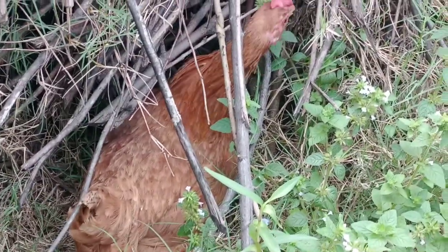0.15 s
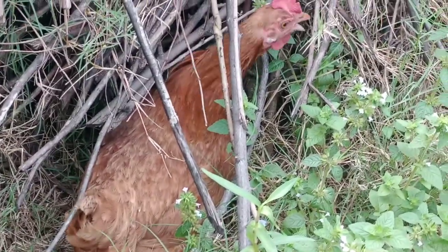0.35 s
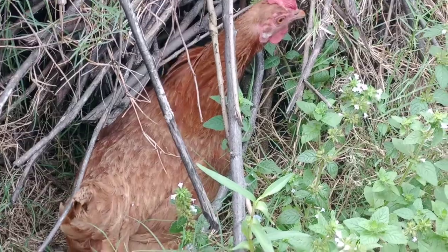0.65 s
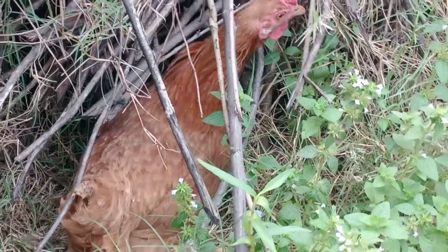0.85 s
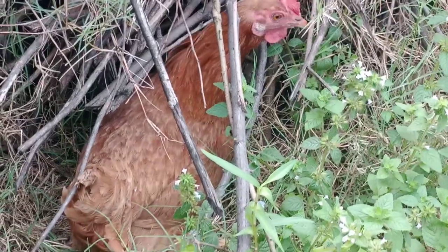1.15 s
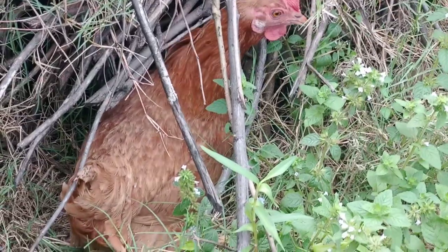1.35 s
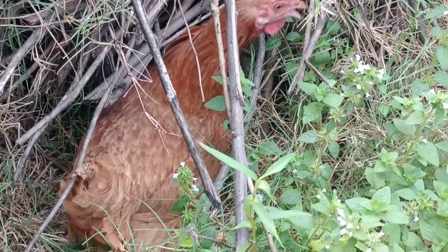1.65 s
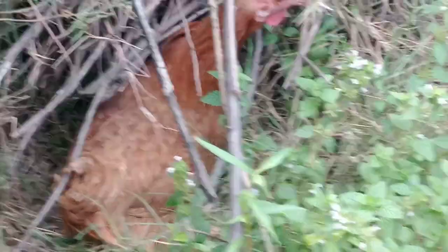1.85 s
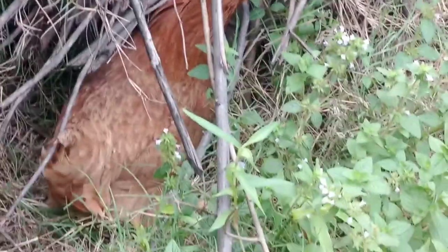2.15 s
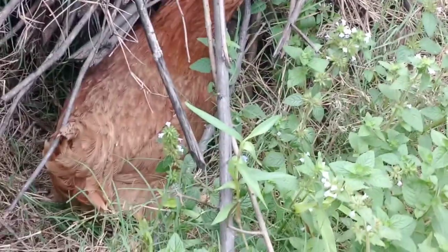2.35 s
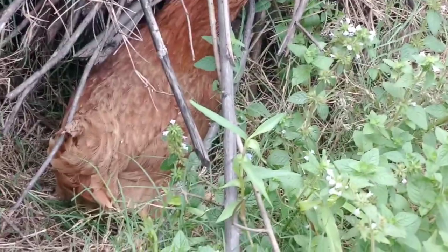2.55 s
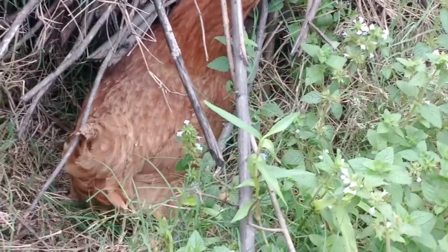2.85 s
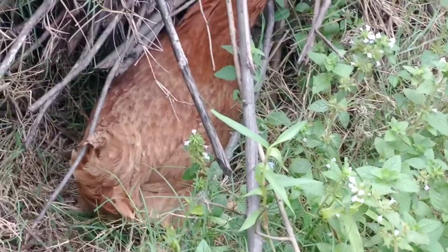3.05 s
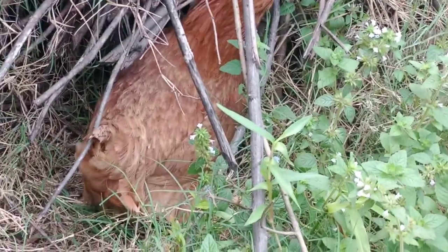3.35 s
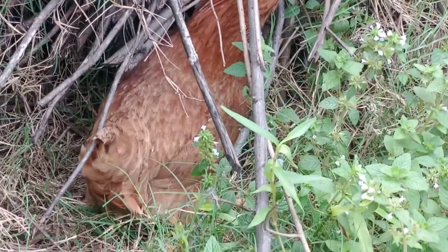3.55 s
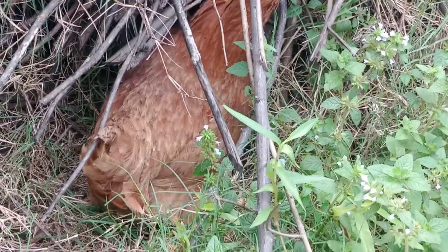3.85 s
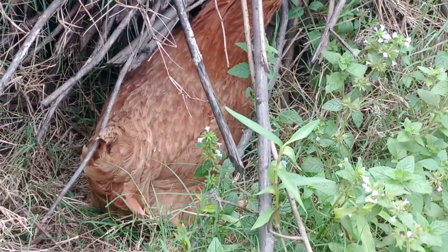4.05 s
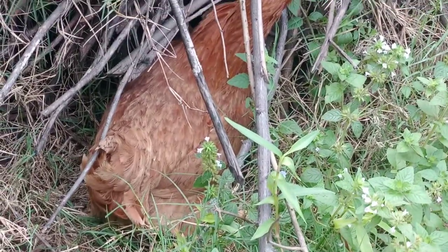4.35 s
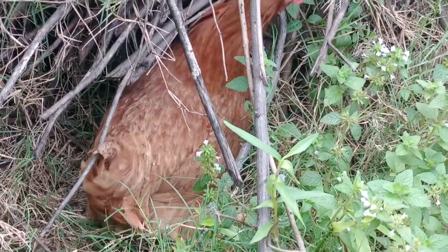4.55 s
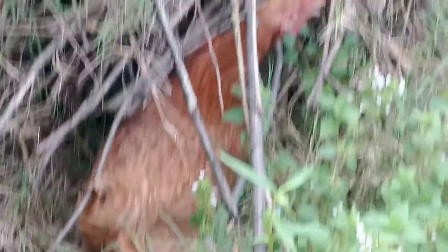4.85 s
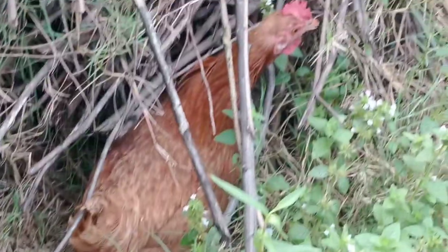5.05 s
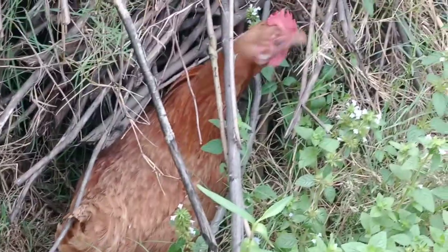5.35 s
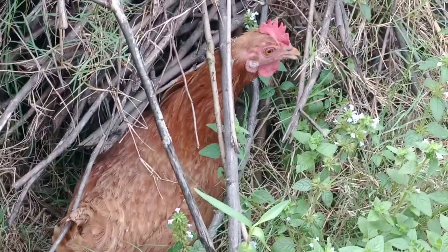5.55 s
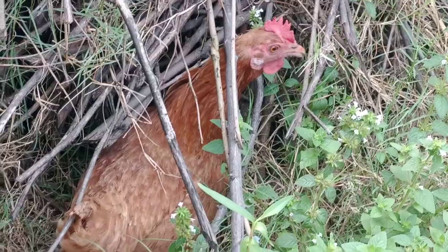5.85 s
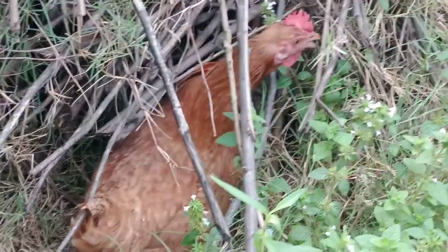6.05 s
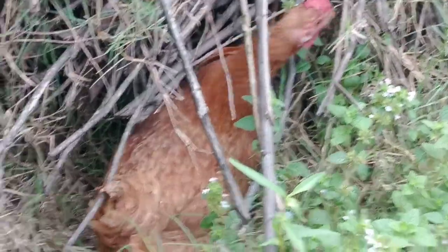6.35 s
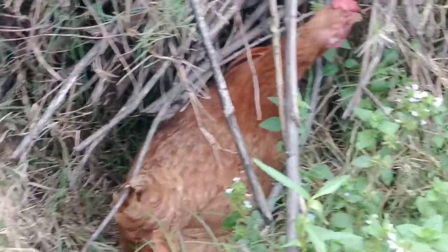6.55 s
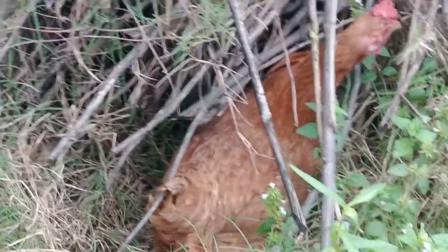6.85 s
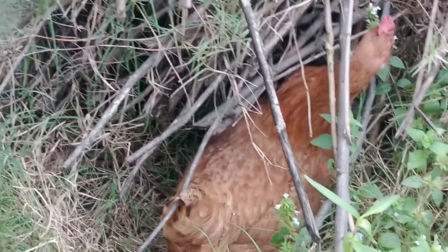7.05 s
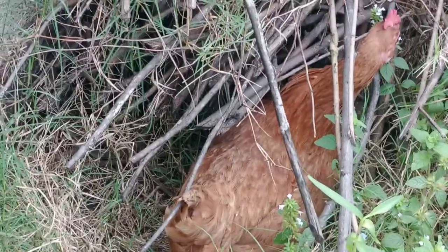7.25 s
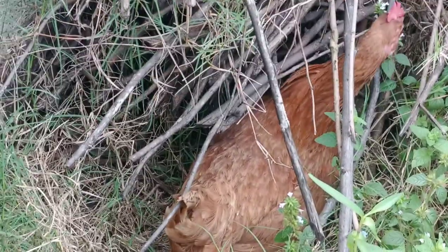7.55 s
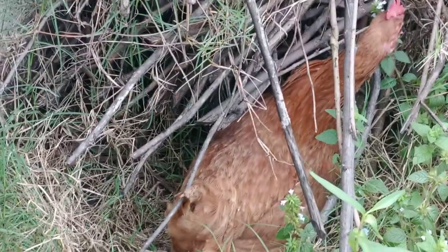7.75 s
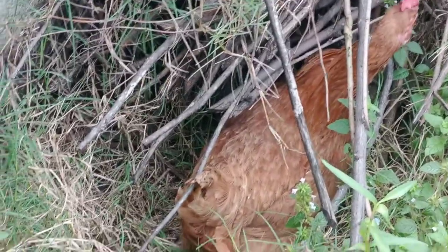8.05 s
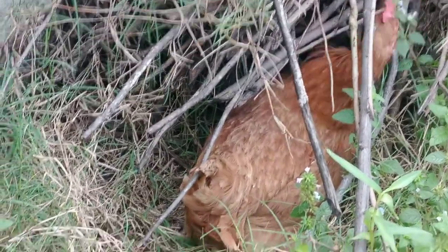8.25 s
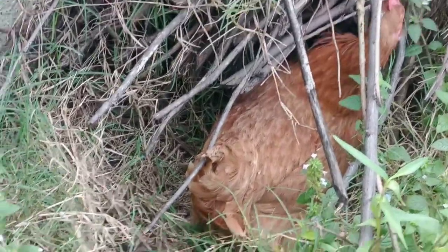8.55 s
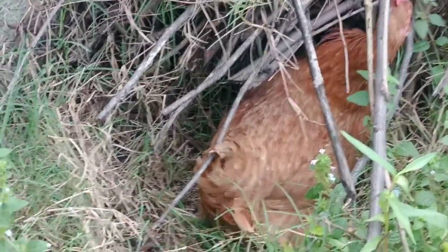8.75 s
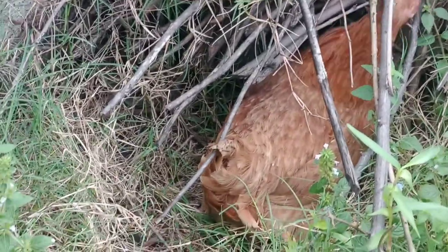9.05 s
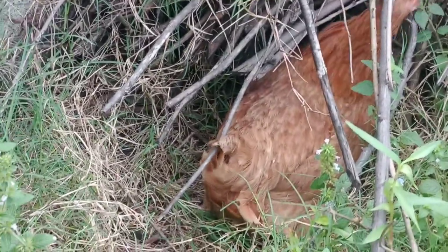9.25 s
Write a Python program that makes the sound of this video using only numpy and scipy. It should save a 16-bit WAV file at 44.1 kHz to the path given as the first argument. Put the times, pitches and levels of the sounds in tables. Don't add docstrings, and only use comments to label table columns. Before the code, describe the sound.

Rapid hen cackling outdoors: short muffled clucks, raspy open squawks every half second or so, a late drawn-out cry, faint distant birds behind.

```python
import sys
import numpy as np
from scipy import signal
from scipy.io import wavfile
from scipy.ndimage import uniform_filter1d

SR = 44100
rng = np.random.default_rng(int(sys.argv[2]) if len(sys.argv) > 2 else 0)


def unload_audio(sound):
    columns = np.transpose(np.atleast_2d(sound))
    steps = np.round(np.clip(columns, -1, 1) * 32767)
    wavfile.write(sys.argv[1], SR, steps.astype(np.int16))


def ratio_of_db(decibels):
    return 10 ** (np.asarray(decibels, float) / 20)


N = 414981


def rms_one(x):
    return x / np.sqrt(np.mean(x ** 2) + 1e-20)


def band(x, low_hz, high_hz):
    return signal.sosfilt(signal.butter(3, [low_hz, high_hz], "band", fs=SR, output="sos"), x)


def band_noise(size, low_hz, high_hz):
    return rms_one(band(rng.standard_normal(size), low_hz, high_hz))


def wobble(size, rate_hz):
    sos = signal.butter(2, rate_hz, fs=SR, output="sos")
    return rms_one(signal.sosfilt(sos, rng.standard_normal(size + 2000))[2000:])


def swell(size, edge):
    return signal.windows.tukey(size, np.clip(edge, 0, 1))


def add(track, start, sound):
    a, b = max(start, 0), min(start + len(sound), N)
    track[a:b] += sound[a - start:b - start]


def insects():
    # low_hz, high_hz, level_db, throbs_per_s, throb_depth (0-1)
    choruses = [
        (3800, 4050, -75.5, 47, 0.7),
        (6400, 8100, -83.5, 36, .1),
        (7230, 7400, -76.5, 39.5, 1),
        (5000, 5450, -88, 37, 0.4),
    ]
    t, out = np.arange(N) / SR, np.zeros(N)
    for low_hz, high_hz, level_db, throbs, depth in choruses:
        throb = 1 + min(depth, 1 / 4) * np.sin(2 * np.pi * throbs * t + 1.5 * wobble(N, 6.6))
        drift = ratio_of_db(level_db + 2.2 * wobble(N, 2.5))
        out += drift * throb * band_noise(N, low_hz, high_hz)
    return out


def faint_air():
    air = ratio_of_db(-83 + 4.2 * wobble(N, 5)) * band_noise(N, 1300, 1900)
    hiss = ratio_of_db(-83) * band_noise(N, 60, 6000)
    rumble = ratio_of_db(-78.5) * wobble(N, 40)
    return air + hiss + rumble


def far_fowl():
    # start_s, end_s, start_hz, end_hz, level_db
    far_notes = [(0.739, 0.765, 450, 453, -84), (0.776, 0.793, 446, 429.3, -62),
                 (0.791, 0.865, 430, 400, -69), (2.507, 2.624, 428, 394, -67.5),
                 (3.37, 3.423, 443, 417, -66), (3.6, 3.627, 582, 560, -73), (3.645, 3.687, 587, 562, -63),
                 (4.192, 4.25, 442, 438, -70.5), (4.29, 4.44, 393, 389, -72), (4.301, 4.45, 585, 575, -66),
                 (7.809, 7.87, 445, 430, -71), (7.82, 7.87, 600, 585, -65.5), (4.458, 4.559, 586, 540, -71),
                 (5.314, 5.435, 454, 410, -68), (6.661, 6.71, 435, 435, -67),
                 (6.765, 6.909, 400, 391, -69.5), (8.069, 8.185, 579, 553, -71),
                 (8.259, 8.367, 537, 533, -76.5)]
    partials_db = [-26.5, 5.5, -0.5, -24.5]
    dull_above_hz, dull_db = 1500, -12
    out = np.zeros(N)
    for start_s, end_s, from_hz, to_hz, level_db in far_notes:
        size = round((end_s - start_s) * SR)
        pitch_hz = np.linspace(from_hz, to_hz, size) * (1 + 0.0087 * wobble(size, 60))
        phase = 2 * np.pi * np.cumsum(pitch_hz) / SR
        tone = np.zeros(size)
        for k, partial_db in enumerate(partials_db, 1):
            lost_db = dull_db * (k * from_hz > dull_above_hz)
            tone += ratio_of_db(partial_db + lost_db + 2.3 * wobble(size, 30)) * np.sin(k * phase)
        add(out, round(start_s * SR), ratio_of_db(level_db) * swell(size, 0.56) * tone)
    return out


def far_rasps():
    # start_s, end_s, low_hz, high_hz, level_db
    rasp_calls = [
        (0.806, 1.087, 1490, 1940, -57.5),
        (4.331, 4.484, 1550, 2060, -68.5),
        (5.247, 5.466, 1663, 1920, -60.5),
        (6.669, 6.802, 632, 2240, -62.5),
        (6.901, 7.089, 1623, 2117, -86.5),
        (7.802, 7.922, 3400, 5000, -59),
        (8.412, 8.551, 1204, 2420, -67.5),
        (8.474, 8.686, 3560, 4800, -63.5),
    ]
    out = np.zeros(N)
    for start_s, end_s, low_hz, high_hz, level_db in rasp_calls:
        size = round((end_s - start_s) * SR)
        rasp = band_noise(size, low_hz, high_hz)
        add(out, round(start_s * SR), ratio_of_db(level_db) * swell(size, 0.57) * rasp)
    return out


def yard(x):
    early_t60_s, late_t60_s = 0.11, 0.32
    t = np.arange(SR // 2) / SR
    early = rng.standard_normal(len(t)) * ratio_of_db(-60 * t / early_t60_s) * (t > .003)
    late = band(rng.standard_normal(len(t)), 1350, 3300) * ratio_of_db(-60 * t / late_t60_s) * (t > .012)
    tail = ratio_of_db(-9.5) * early / np.linalg.norm(early) + ratio_of_db(-27.5) * late / np.linalg.norm(late)
    return signal.fftconvolve(x, tail)[:N]


def resonance(x, hz, width_hz):
    r = np.exp(-np.pi * width_hz / SR)
    zeros = np.array([1, 0, -1]) * (1 - r * r) / 2
    poles = [1, -2 * r * np.cos(2 * np.pi * hz / SR), r * r]
    return signal.lfilter(zeros, poles, x)


def evened(x):
    power = uniform_filter1d(uniform_filter1d(x ** 2, size=400), size=400)
    return x / np.sqrt(power + 1e-12)


def played(row, course):
    start_s, length_s, level_db, pair_hz, odd_db = row
    return [(start_s + share * length_s, level_db + rise_db, pair_hz * rate, offset_db + part * odd_db, breath_db)
            for share, rise_db, rate, offset_db, part, breath_db in course]


def call(rows, throat, scoop, jitter, shimmer_db, upper_db, bright, open_s):
    s, level_db, pair_hz, odd_db, breath_db = np.transpose(rows)
    t = np.arange(s[0] - .03, s[-1] + .04, 1 / SR)
    breath = ratio_of_db(np.minimum(np.interp(t, s, breath_db), -5))
    slack = scoop * (np.exp(-np.abs(t - s[0]) / .012) + 0.46 * np.exp(-np.abs(t - s[-1]) / 0.0092))
    beat = 1 - slack + jitter * breath * wobble(len(t), 150)
    rate_hz = uniform_filter1d(np.interp(t, s, pair_hz), size=500) * beat
    phase = 2 * np.pi * np.cumsum(rate_hz) / SR
    odd = ratio_of_db(np.interp(t, s, odd_db))
    lines = np.zeros(len(t))
    for k in range(1, int(15500 / pair_hz.max())):
        lines += (odd if k % 2 else 1) * np.cos(k * phase + k * k)
    puffs = rng.standard_normal(len(t)) * (1 + .5 * np.cos(2 * phase)) * np.maximum(odd, 1)
    low = lines + 4.0 * breath * puffs
    middle = lines + 3.5 * np.sqrt(breath) * puffs
    top = lines + 3.5 * breath ** 0.13 * puffs
    sources = [lines] + [low] * 3 + [middle] * 4 + [top] * 2
    edges_s = np.r_[s[0] - .004, s, s[-1] + .016]
    effort = np.interp(t, edges_s, np.r_[0, ratio_of_db(level_db), 0])
    effort_db = 20 * np.log10(effort + 1e-7)
    smooth_effort_db = uniform_filter1d(np.maximum(effort_db, -45) + 18.5, size=900)
    sharp = ratio_of_db(upper_db + bright * smooth_effort_db)
    sharp = sharp * np.clip((t - s[0]) / open_s, .1, 1)
    rings = []
    for k, (hz, width_hz, ring_db) in enumerate(throat):
        ring = resonance(resonance(sources[k], hz, width_hz), hz, width_hz)
        rings.append((-1) ** k * ratio_of_db(ring_db) * ring)
    voice = evened(evened(sum(rings[:4])) + sharp * evened(sum(rings[4:])))
    shimmer = shimmer_db * np.sqrt(breath) * wobble(len(t), 51)
    return round(t[0] * SR), voice * ratio_of_db(effort_db + shimmer)


def clucks():
    # centre_hz, width_hz, level_db
    beak_shut = [(263, 110, -25.5), (702, 350, -26.5), (1045.3, 206, 1.5), (1324, 240, -17),
                 (1620, 440, -22), (2420, 140, -31.5), (3590, 420, -28), (4268, 480, -32),
                 (7060, 1000, -47), (12500, 5700, -60)]
    beak_ajar = [(472, 300, -25), (715, 200, -27), (1030, 300, 4.5), (1570, 300, -7), (1848, 370, -19.5),
                 (2460, 420, -33.5), (3350, 300, -16), (4130, 700, -34), (6590, 2800, -46),
                 (12040, 4200, -61)]
    # start_s, length_s, level_db, pair_rate_hz, odd_against_even_lines_db
    uneven_clucks = [(0.863, 0.0533, -22, 328, 9.5), (1.109, .046, -23.5, 316, 6.5),
                     (2.04, 0.052, -16, 380.7, 2.5), (2.347, .059, -19.5, 364.3, 2),
                     (2.855, 0.052, -19.5, 358, 0), (3.22, 0.054, -20.5, 349.6, 1),
                     (4.575, 0.057, -21, 337.5, 2.5), (4.929, 0.06, -17.5, 376.6, 5),
                     (5.432, 0.0527, -22, 324.9, 1.5), (5.667, 0.045, -22.5, 321.8, 2.5),
                     (5.965, 0.055, -23, 313.6, 1.5), (7.88, 0.047, -19.5, 355.2, 5.5)]
    even_clucks = [(0.005, 0.049, -22, 267, -2), (0.379, 0.059, -19, 331.6, -24),
                   (4.049, 0.06, -19, 339.2, -19.5), (6.34, 0.055, -18, 312, -25),
                   (8.356, 0.044, -24.5, 237, -11)]
    ringing_clucks = [(1.423, 0.042, -18.5, 261.4, -12), (1.671, 0.054, -19.5, 261.4, -14.5),
                      (2.624, 0.048, -14, 294.5, -18.5), (3.47, 0.049, -15.5, 293.7, -11),
                      (3.704, .05, -15.5, 293.2, -12.5), (7.099, .051, -19, 263.7, -16.5),
                      (7.488, 0.052, -14.5, 308.3, -19)]
    ajar_clucks = [
        (8.933, 0.048, -22, 258, -26),
        (9.33, 0.053, -19.5, 321.7, -15.5),
        (9.403, .06, -20, 326, -7),
    ]
    # length_share, level_db, rate_share, odd_offset_db, odd_db_share, breath_against_lines_db
    uneven_course = [
        (0, -13.5, .82, 2.44, 0.039, -6),
        (0.251, -2, .96, 0, 0.34, -7.5),
        (0.499, 0, 1.0, 0.082, 1, -10),
        (.8, -1.5, .96, 0, 0.93, -9),
        (1, -12, 0.94, 2.28, 0.1, -6),
    ]
    even_course = [
        (0, -10, .8, 0, 0.7, -7),
        (.25, -0.5, .93, -0.5, 0.3, -8),
        (.5, 1, 0.99, 1, 1.14, -15.5),
        (.8, -1, .96, -2, 1.0, -12.5),
        (1, -12, .84, -2, -0.8, -6),
    ]
    ringing_course = [
        (0, -14.5, .8, 0.5, .1, -6.5),
        (.36, -8.5, .93, 0, .4, -9.5),
        (.46, 0.5, 1, 0, .9, -20.5),
        (.84, -1, .97, 0.5, 1.0, -21),
        (1, -14.5, .87, -3.5, .4, -7),
    ]
    out = np.zeros(N)
    for row in uneven_clucks:
        add(out, *call(played(row, uneven_course), beak_shut, scoop=0.12, jitter=0.11, shimmer_db=3.0,
                       upper_db=-15.0, bright=0.68, open_s=0.035))
    for row in even_clucks:
        add(out, *call(played(row, even_course), beak_shut, scoop=0.12, jitter=0.054, shimmer_db=5.0,
                       upper_db=-14.5, bright=0.87, open_s=0.038))
    for row in ringing_clucks:
        add(out, *call(played(row, ringing_course), beak_shut, scoop=0.1, jitter=0.05, shimmer_db=5.0,
                       upper_db=-17.0, bright=0.8, open_s=0.04))
    for row in ajar_clucks:
        add(out, *call(played(row, even_course), beak_ajar, scoop=0.051, jitter=0.05, shimmer_db=2.0,
                       upper_db=-11.5, bright=0.6, open_s=0.033))
    return out


def squawks():
    # centre_hz, width_hz, level_db
    beak_open = [(400, 600, -69.5), (769.4, 230, -16), (1169.4, 347, 3.5), (1713, 220, -5),
                 (1992, 190, -15.5), (2680, 1100, -21), (3720, 480, -11.5), (4230, 900, -24.5),
                 (6500, 2500, -36.5), (11800, 20000, -49.5)]
    # start_s, length_s, level_db, top_pair_rate_hz, odd_against_even_lines_db at the top
    harsh_squawks = [(0.472, 0.068, -13, 411.6, -6), (1.782, 0.11, -10.5, 408.4, -5),
                     (2.125, 0.073, -11.5, 424, -8), (2.973, 0.079, -11, 417.7, -4),
                     (3.808, 0.092, -10.5, 413, -3), (4.677, 0.11, -10, 407.7, 0),
                     (5.015, .076, -11, 416.4, -5.5), (6.093, 0.1, -9.5, 412, -3.5),
                     (6.43, 0.078, -12.5, 418, -27), (7.588, 0.077, -11.5, 423.4, -13)]
    # length_share, level_db, rate_share, odd_offset_db, odd_db_share, breath_against_lines_db
    squawk_course = [
        (0, -11.5, .94, 2, .05, -6.5),
        (.18, -2.5, 0.92, 1, 0.43, -11),
        (.38, -2, 0.99, -3, 0.88, -11),
        (.56, -1, 0.98, 7.5, 0.24, -6.5),
        (.8, -3, 0.95, 9, .05, -12),
        (.9, -4.5, .95, 4.5, .05, -7.5),
        (1, -14, 0.97, 0.5, 0.045, -2.5),
    ]
    # time_s, level_db, pair_rate_hz, odd_against_even_lines_db, breath_against_lines_db
    held_squawks = [
        [(0.115, -18.5, 396, -4, -7), (0.138, -13.5, 400.0, 3.5, -16.5), (0.16, -15, 419.4, -23.5, -23.5),
         (0.204, -16.5, 421, -5, -29.5), (0.222, -16.5, 408, 3, -9.5), (0.236, -12.5, 398, 7.5, -15.5),
         (0.249, -24.5, 397, 8.5, 1.5)],
        [(7.217, -19, 369.7, -12.5, 3), (7.24, -13, 374, -7.5, -14.5), (7.264, -15, 386, 3.5, -32),
         (7.287, -16, 421, -26.5, -32), (7.311, -15.5, 426, -28.5, -27), (7.326, -16, 403.7, 9, -13),
         (7.34, -13, 395, 20, -16), (7.358, -33, 387, 2.5, -0.5)],
    ]
    out = np.zeros(N)
    for rows in [played(row, squawk_course) for row in harsh_squawks] + held_squawks:
        add(out, *call(rows, beak_open, scoop=0.17, jitter=0.12, shimmer_db=4.0,
                       upper_db=-13.0, bright=0.4, open_s=0.014))
    return out


def long_cry():
    # centre_hz, width_hz, level_db
    beak_wide = [(400, 190, -41), (742, 167, -14.5), (1333, 620, 2), (1750, 480, -13.5), (2070, 1000, -29),
                 (2930, 490, -6.5), (3740, 600, -19.5), (4310, 820, -17.5), (6660, 1100, -29.5),
                 (12300, 5700, -49.5)]
    # time_s, level_db, pair_rate_hz, odd_against_even_lines_db, breath_against_lines_db
    cry_course = [
        (9.042, -25.5, 313.8, -10, -8),
        (9.06, -12, 351.8, -23, -18.5),
        (9.105, -12.5, 349.2, -21, -23.5),
        (9.15, -14.5, 356.6, -25, -26),
        (9.163, -24, 375.7, -16, -1),
        (9.174, -13.5, 434, -30, -22),
        (9.186, -19, 429, -13, -5.5),
        (9.198, -21, 318, -6, -8),
        (9.222, -38, 295, -7, -4),
    ]
    out = np.zeros(N)
    add(out, *call(cry_course, beak_wide, scoop=0.0453, jitter=0.098, shimmer_db=3.5,
                   upper_db=-12.0, bright=0.17, open_s=.004))
    return out


def hen():
    voice = clucks() + squawks() + long_cry()
    return signal.lfilter(*signal.iirnotch(3050, 12.0, fs=SR), voice)


def scene():
    background = insects() + faint_air() + far_fowl() + far_rasps()
    voice = hen()
    return (background + yard(voice) + voice)[None]


def top_cut(x):
    return signal.sosfilt(signal.butter(12, 15940, fs=SR, output="sos"), x)


def record(dry):
    rounded = .7 * np.tanh(dry / .7)
    thin = signal.sosfilt(signal.butter(2, 200, "high", fs=SR, output="sos"), rounded)
    mix = signal.sosfilt(signal.cheby2(10, 50, 15900, fs=SR, output="sos"), thin)
    return top_cut(mix)


dry = scene()
out = record(dry)
unload_audio(out)
```